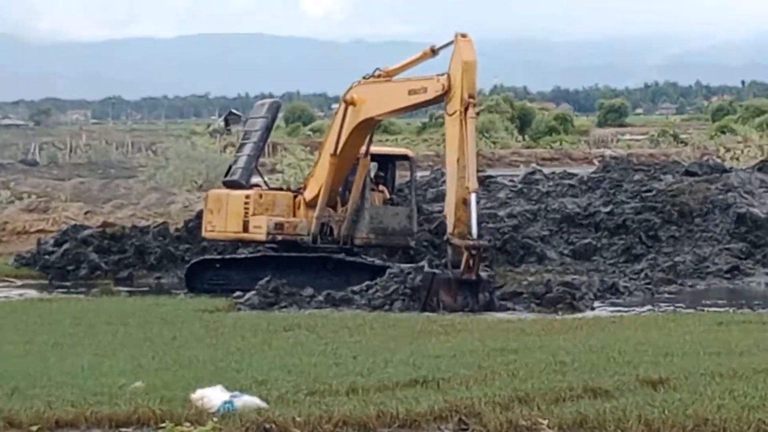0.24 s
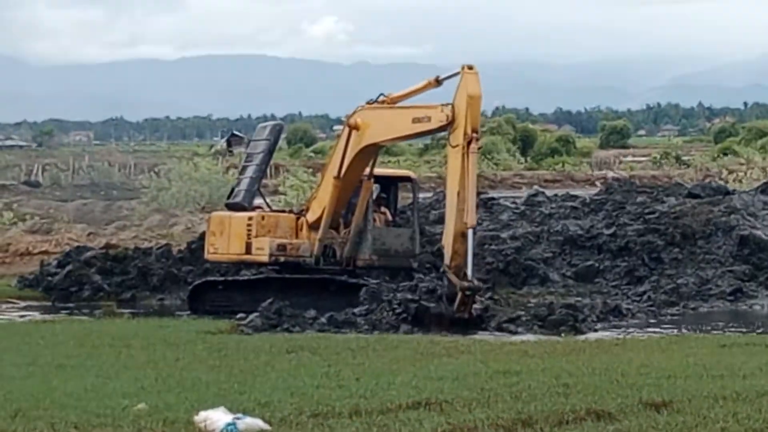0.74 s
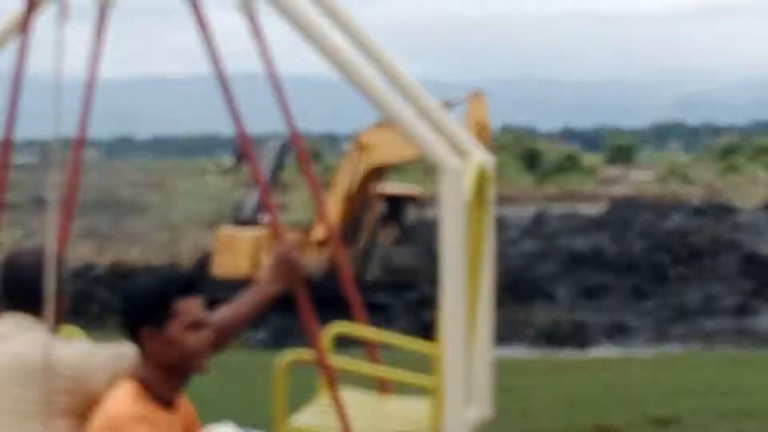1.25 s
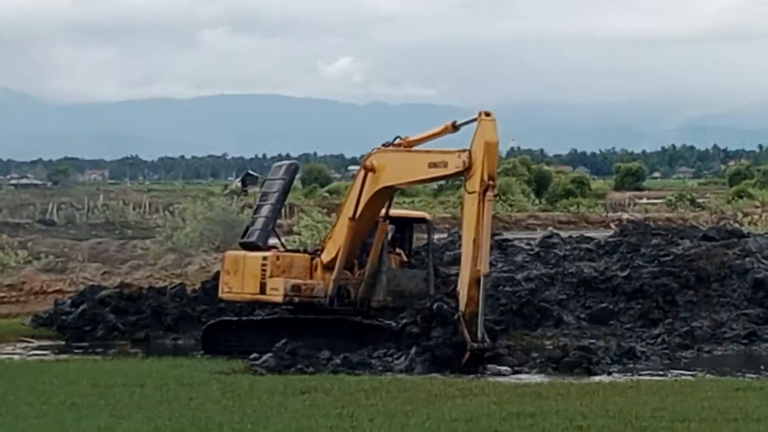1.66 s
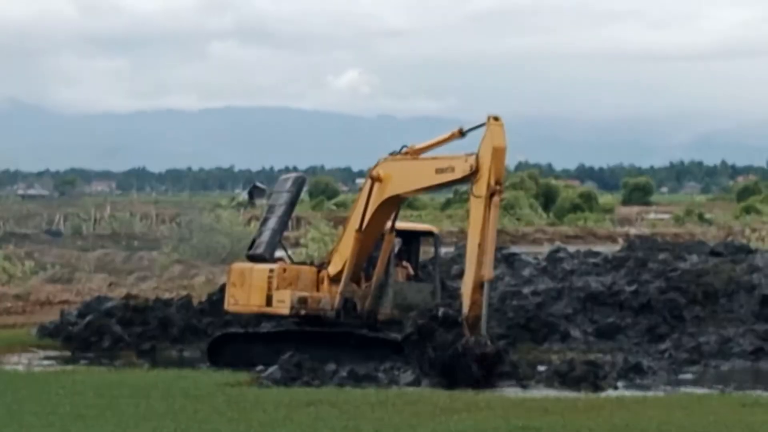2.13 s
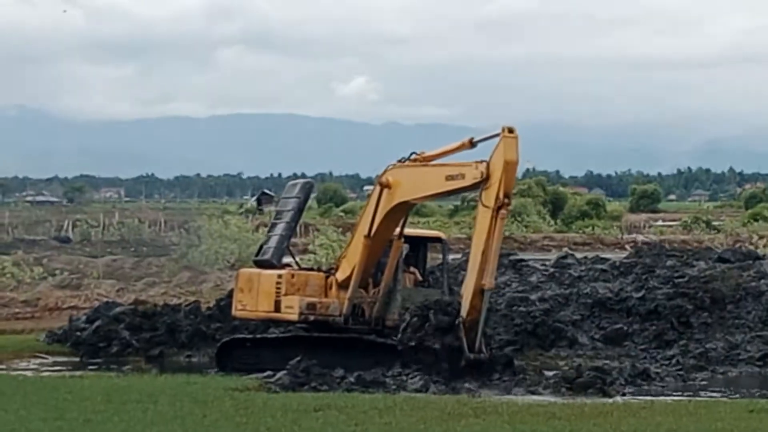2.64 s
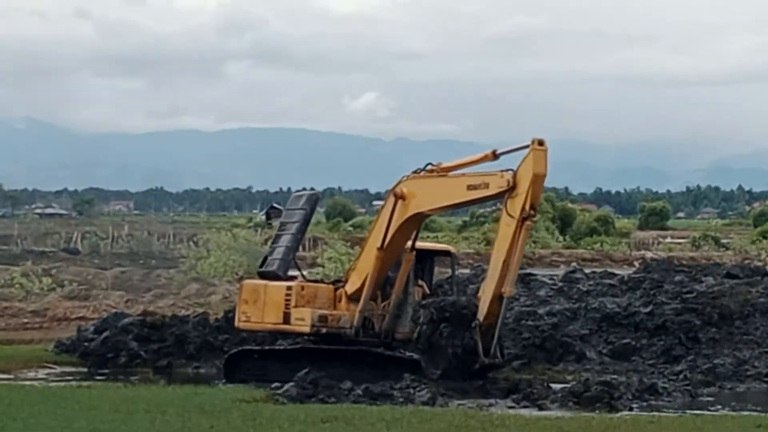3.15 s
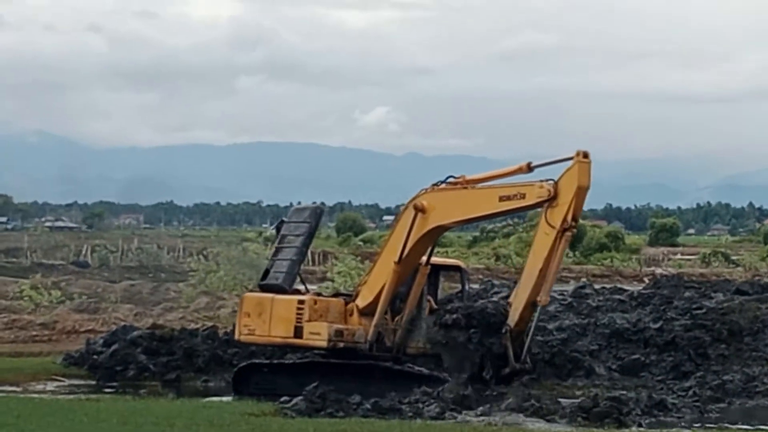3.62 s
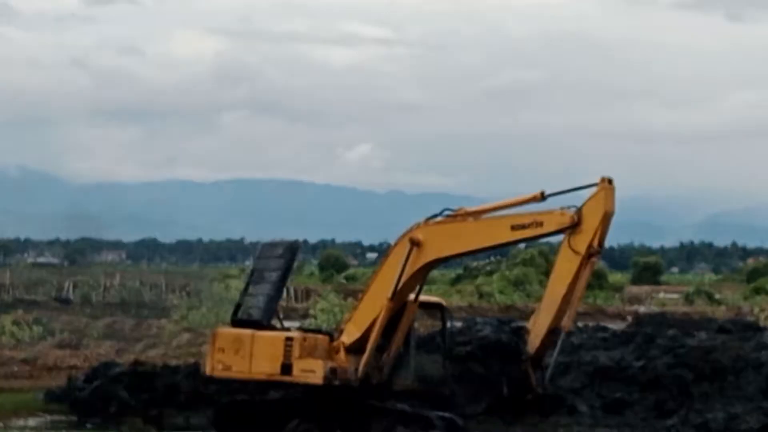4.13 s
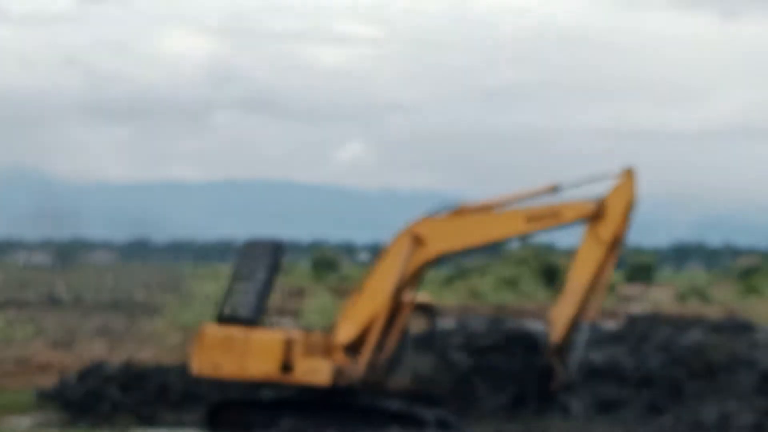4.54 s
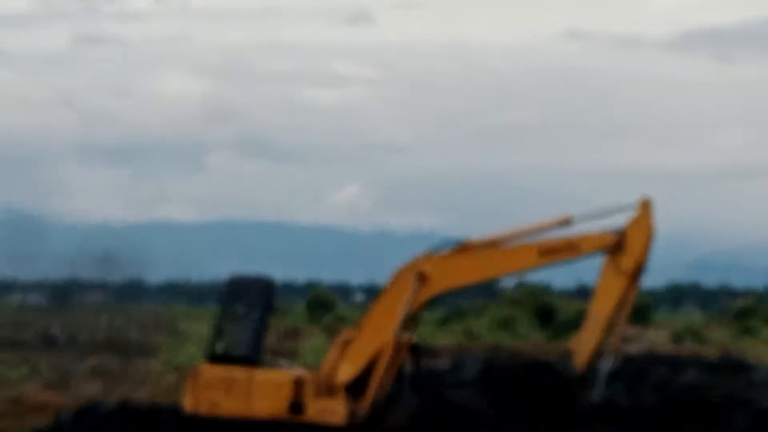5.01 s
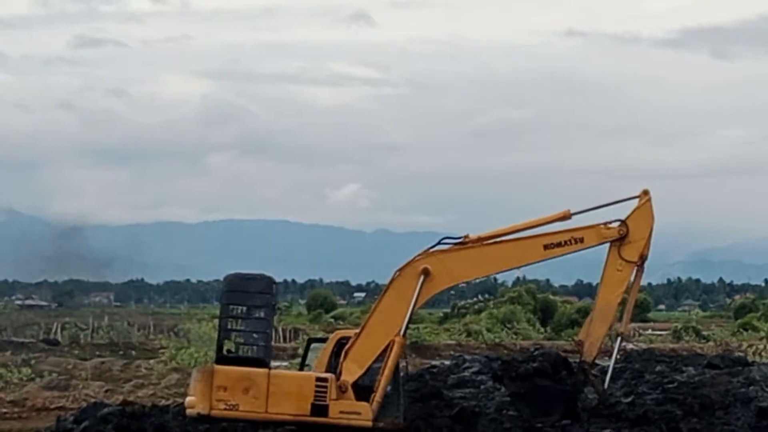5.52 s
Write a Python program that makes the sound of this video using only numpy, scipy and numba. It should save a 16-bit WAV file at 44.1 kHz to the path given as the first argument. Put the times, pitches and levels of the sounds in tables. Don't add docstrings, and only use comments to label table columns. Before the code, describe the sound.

A single-cylinder diesel thumps fast, swells close with clatter and hiss, recedes, then returns with metallic ticking and rattles outdoors.

```python
import sys
import numpy as np
from scipy import signal
from scipy.fft import rfft, irfft, next_fast_len
from scipy.io import wavfile
from scipy.ndimage import uniform_filter1d
from numba import njit

SR = 44100
rng = np.random.default_rng(int(sys.argv[2]) if len(sys.argv) > 2 else 0)


def boost_factor(decibels):
    exponent = np.asarray(decibels, float) / 20
    return 10 ** exponent


def wav_record(signal):
    frames = np.transpose(np.atleast_2d(signal))
    bounded = np.clip(frames, -1, 1)
    quanta = np.round(bounded * 32767).astype(np.int16)
    wavfile.write(sys.argv[1], SR, quanta)


N = 254456
T = np.arange(N) / SR

# freq_hz, level_db (per Hz)
PIPE_TONE = [(15, -77), (25, -40), (48, -8), (64, -17), (102, -9.5), (123, 3), (140, 6), (198, -7),
             (223, -22.5), (279, -11), (395, -14.5), (458, -23), (525, -24), (677, -29), (900, -14.5),
             (1170, -45), (1980, -120)]
# time_s, ahead_firings
ARRIVAL_SHIFT = [(0, -.5), (1.2, -.52), (2, -.56), (2.6, -.59), (3.25, -.63), (3.6, -.57), (4, -.46),
                 (4.5, -.4), (5, -.33), (5.3, -.24), (5.77, -.18)]
# time_s, pipe_nearness_db, ground_echo_on_upper_mode_db, casing_sight_db, hiss_aim_db
RIDE = [(0, -23, 1, -13, -8.5), (.22, -17, -1, -10, -7), (.45, -12, -6.5, -5.5, -5.5),
        (.8, -7, -0.5, -3, -2.5), (1.2, -2, -0.5, -.5, -0.5), (1.45, 0.5, -5, 0, -1.5),
        (1.9, -1.5, 1.5, -1, -1), (2.3, -5, 1.5, -5, 3), (2.6, -12.5, 7, -7.5, 2.5),
        (2.8, -13, -1.5, -10.5, 0.5), (2.95, -12.5, -1, -16.5, 3), (3.2, -15, -4.5, -23, 3),
        (3.7, -17.5, 4, -23.5, 2), (4.2, -15.5, -3.5, -25.5, -1.5), (4.6, -16.5, -5, -25, -4.5),
        (4.85, -19, -1, -25, -5), (5.25, -14.5, -2.5, -27.5, -0.5), (5.77, -14, -4.5, -23, 7.5)]
# time_s, length_s, level_db
SURGES = [(.14, 0.032, 2), (.31, 0.026, 0), (2.0, 0.026, -1.5), (2.15, 0.04, -4), (2.73, 0.025, -0.5),
          (3.1, 0.035, 5), (3.17, 0.084, -4.5), (3.57, 0.042, -4.5), (3.95, 0.037, -1.5), (4.26, 0.047, 4),
          (4.39, 0.028, -6), (4.46, 0.035, 3.5), (5.35, .025, -8), (5.4, 0.018, 7), (5.445, 0.025, -15),
          (5.485, 0.017, 6.5), (5.54, .025, -10)]
# freq_hz, level_db (per Hz)
CASING_TONE = [(290, -20.5), (500, 24), (676, 1.5), (915, -2), (1040, -2.5), (1370, -1), (1750, -3.5),
               (2020, -5), (2690, -18), (3590, -23), (4510, -38), (7150, -24), (8370, -21.5), (13100, -30),
               (15500, -41)]
# level_in_full_sight_db, share_of_sight (dB per dB), gain_coming_round_db
CASING_BANDS = [
    (-40, 1.05, 17.5),
    (-42.5, 0.65, 8),
    (-47.5, 1.13, -2),
    (-49, 0.52, -0.6),
]
# time_s, length_s, level_db
FLASHES = [(2.03, 0.037, -1), (2.12, .025, 0.5), (2.17, 0.036, -3), (3.29, 0.021, -1), (5.15, 0.035, 1.5),
           (5.53, 0.019, -4), (5.62, 0.023, 2.5)]
# time_s, first_gap_hz, first_depth_db, upper_depth_db
HAND_GAPS = [(0, 2810, 19, 7), (.9, 3070, 18, 14), (1.3, 3550, 9.5, 17), (1.7, 4210, 16.5, 16),
             (2.1, 4690, 16.5, -2), (3.1, 5560, 19.5, 1.5), (4.3, 5880, 19, -2.5), (5.77, 6100, 37, -1)]
# start_s, end_s, first_hz, last_hz, level_db
PANELS = [(0, 0.93, 760, 700, -48), (0, 0.69, 1430, 1410, -52), (.5, 1.23, 1110, 1105, -46),
          (0.8, 1.8, 10180, 9640, -53.5), (0.5, 1.32, 3900, 4020, -64.5), (2.5, 3.08, 808, 917, -47.5),
          (3, 3.84, 780, 788, -55), (2.5, 3.6, 960, 1027, -59), (3, 4.93, 1464, 1490, -62),
          (3.5, 4.58, 2010, 1900, -57.5), (4.5, 5.42, 1803, 1795, -56.5), (5, 5.56, 1270, 1400, -57.5),
          (5.5, 5.83, 2550, 2680, -70.5), (5, 5.86, 1163, 995, -52.5), (5, 5.74, 244, 255, -52.5),
          (4.5, 5.64, 7800, 7750, -65), (4.5, 6, 8500, 8600, -65), (6, 5.77, 2000, 2200, -67),
          (3, 3.19, 2015, 1890, -52.5), (1, 2.4, 5600, 6760, -60.5), (5, 5.26, 1600, 1770, -57)]
# time_s, tick_db
GEAR_TEETH = [
    (4.18, -54),
    (4.7, -42.5),
    (5.3, -46),
    (5.77, -41.5),
]
# time_s, peak_db, pitch_hz
KNOCKS = [(4.1258, -57, 8300), (4.2086, -50, 8270), (4.7788, -33.5, 8660), (4.8157, -42.5, 8550),
          (4.9955, -39.5, 7920), (5.1821, -34.5, 8480), (5.3889, -39, 8320), (5.5733, -38, 8770),
          (5.6179, -33.5, 9210), (5.693, -36, 9100)]
# time_s, peak_db, pitch_hz
JINGLES = [(4.264, -46, 9900), (4.4245, -44, 11040), (4.453, -49, 10000), (4.6705, -48, 11200),
           (4.824, -48, 11400), (4.9589, -45.5, 10800), (4.9913, -41.5, 11400), (5.1789, -49, 11300),
           (5.3101, -52, 12100), (5.351, -45, 10400), (5.4123, -46, 10100), (5.4657, -52, 11600),
           (5.5066, -51, 12000), (5.558, -42, 11000), (5.5919, -39, 11300), (5.6164, -42, 12600),
           (5.6553, -49, 12000), (5.6937, -47, 11600), (5.722, -35.5, 10700)]
# time_s, peak_db, pitch_hz
CHIRPS = [(4.06, -66, 3720), (4.958, -64, 5300), (5.1952, -64, 4370), (5.3922, -62, 4540),
          (5.703, -72, 4400), (5.6, -43, 610), (5.22, -48, 680), (5.33, -47.5, 510), (2.9081, -78, 4380),
          (2.9455, -68, 4400), (3.0632, -72, 4350), (3.174, -76, 4380), (3.2164, -73, 4380),
          (3.6469, -78, 4400), (4, -76, 4350), (3.7626, -74, 4350), (3.84, -75, 4000), (1, -56, 3100),
          (1.1, -51.5, 3900), (1.1897, -52.5, 4250), (.232, -43, 720), (.53, -42, 600)]
# time_s, level_db
DIGGER_LOAD = [
    (0, -64),
    (2.3, -47),
    (2.9, -45),
    (3.07, -61),
    (3.55, -57),
    (3.86, -39),
    (3.97, -56),
    (4.26, -39),
    (5.77, -41),
]
# freq_hz, level_db (per Hz)
FIELD_TONE = [(12, -71), (20, -22), (144, -7.5), (191, -7), (238, -35), (333, -20), (549, -30.5),
              (1980, -32), (4810, -72), (8640, -46), (15500, -90)]
# time_s, length_s, freq_hz, width_hz, level_db
SHADOWS = [(0.31, 0.11, 295, 44, -24), (0.12, 0.46, 936, 123, -15.5), (2.25, 0.2, 1090, 80, -9.5),
           (5.61, 0.28, 818, 102, -19), (4.7, 0.056, 530, 250, 12.5), (3.47, 0.11, 410, 126, 11),
           (3.92, 0.077, 350, 95, 8), (4.45, 0.083, 313, 67, 10), (2.55, 0.14, 263, 39, 5),
           (2.05, 0.15, 353, 44, -6.5), (1.55, 0.17, 286, 24, -2.5), (4.75, 0.1, 1215, 140, 14),
           (0.14, 0.083, 240, 65, 10), (3.04, .12, 770, 55, -13), (0.44, 0.26, 426, 33, 8),
           (3.15, 0.32, 410, 44, -11), (3.16, 0.14, 310, 27, 5.5), (0.95, 0.26, 270, 55, 3.5),
           (5.21, 0.18, 303, 110, -8.5), (2.85, 0.17, 1240, 190, -6), (2.1, 0.66, 3030, 700, 3),
           (0.25, 0.61, 2730, 100, 13), (3.5, 0.37, 43, 36, -8)]
# time_s, length_s, freq_hz, width_hz, level_db
MIRRORS = [(.4, .45, 2460, 91, -11), (.3, .35, 3200, 89, 7), (.85, .08, 3250, 100, 6),
           (1.35, 0.16, 3600, 90, 11), (1.35, 0.16, 3070, 70, -7), (0.67, .3, 2900, 110, -6),
           (.9, 0.39, 3570, 110, -9), (0.13, 0.28, 3800, 130, 5.5), (1.1, 0.34, 4700, 100, 13),
           (1.57, .2, 2220, 100, 6.5), (1.8, .08, 2160, 150, 4.5), (1.28, 0.075, 2600, 130, 1),
           (2.95, 0.12, 3800, 140, 6), (2.83, .1, 3150, 92, 4), (3.45, .05, 2500, 110, 14),
           (5.5, .06, 4150, 100, 10), (5.4, .04, 3950, 100, 9), (5.1, 0.14, 2200, 120, -3.5),
           (3.8, 0.077, 1850, 80, 5), (5.3, .12, 1500, 120, 4), (5.7, .12, 960, 55, 5),
           (5.42, .1, 1230, 100, 4.5), (5.26, 0.041, 1780, 200, 5.5), (5.68, 0.15, 1940, 170, 4.5),
           (2.93, 0.14, 310, 36, 1.5), (2.19, 0.15, 280, 65, 4), (4.75, 0.071, 330, 43, 11),
           (5.62, 0.057, 370, 60, -8), (3.65, .15, 5300, 450, -6)]
# freq_hz, width_hz, level_db
PORT_DIPS = [(4800, 300, -17), (6300, 200, -5), (9400, 250, -8), (11300, 400, -4), (14100, 500, -5)]


def columns(table):
    s, *rest = np.transpose(table)
    return [np.interp(T, s, c) for c in rest]


def unit(x):
    return x / np.sqrt(np.mean(x ** 2))


def bumps(events):
    return sum(db * np.exp(-((T - s) / length) ** 2) for s, length, db in events)


def walk(rate):
    hold = int(SR / rate)
    steps = np.repeat(rng.standard_normal(N // hold + 1), hold)
    return 1.053 * uniform_filter1d(uniform_filter1d(steps, hold), hold)[:N]


def puff(phase, start, length):
    return np.exp(-((phase - start) % 1) / length)


def colour(x, points, build_up=0.):
    size = next_fast_len(N + 16384, real=True) // 2 * 2
    hz, db = np.transpose(points)
    log_gain = np.interp(np.log(np.fft.rfftfreq(size, 1 / SR) + 1), np.log(hz), db) * np.log(10) / 20
    cepstrum = irfft(log_gain, size)
    cepstrum[1:size // 2] *= 2 - build_up
    cepstrum[size // 2 + 1:] *= build_up
    return irfft(rfft(x, size) * np.exp(rfft(cepstrum)), size)[:N]


def band(x, lo_hz, hi_hz):
    octave = np.log2(np.fft.rfftfreq(N, 1 / SR) + 1)

    def edge(hz):
        return .5 + .5 * np.tanh((octave - np.log2(hz)) * 12)

    return unit(irfft(rfft(x) * (edge(lo_hz) - edge(hi_hz)), N))


@njit
def svf(x, hz, width):
    y, b, l = np.empty(len(x)), 0., 0.
    for i in range(len(x)):
        g, k = np.tan(np.pi * hz[i] / SR), width / hz[i]
        v = (b + g * (x[i] - l)) / (1 + g * (g + k))
        b, l, y[i] = 2 * v - b, l + 2 * g * v, k * v
    return y


def echoes(x, paths):
    i = np.arange(N)
    return x + sum(gain * np.interp(i - SR * lag_s * (1 + 0.1926 * walk(1.5)), i, x) for lag_s, gain in paths)


def cells_of(x):
    hz, s, cells = signal.stft(x, SR, nperseg=1024, noverlap=768)
    return hz[:, None], s, cells


def sound_of(cells):
    return signal.istft(cells, SR, nperseg=1024, noverlap=768)[1][:N]


def exhaust_levels():
    near, ground, sight, _ = columns(RIDE)
    pipe = -24.5 + near
    behind_s = np.maximum(T - 2.68, 0)
    bark = -34.5 + 0.56 * near - 8 * behind_s
    upper_bark = -37 + 1.27 * sight
    return [db + bumps(SURGES) for db in (pipe, pipe + ground, bark, upper_bark)]


def exhaust(turns):
    opened = np.floor(turns + .23).astype(int) + 1
    chance = rng.standard_normal((opened[-1] + 1, 2))
    at = np.flatnonzero(np.diff(opened))
    jitter = (6 * chance[opened[at], 0]).astype(int)
    blows = np.zeros(N)
    blows[np.clip(at + jitter, 0, N - 1)] = -boost_factor(1.0 * chance[opened[at], 1])

    bark = echoes(colour(blows, PIPE_TONE), [(.005, .6), (.0085, -.55), (.013, .45), (.022, .3)])
    ring = colour(np.roll(blows, int(.0072 * SR)), PIPE_TONE, build_up=.65)
    gas = colour(rng.standard_normal(N) * (.55 + puff(turns, .78, .4)), PIPE_TONE)
    smear = np.interp(T, [0, .6, 2.6, 3.2, 5.0, 5.77], [.08, .04, .04, .08, .08, .2])
    # source, low edge Hz, high edge Hz, times more smear
    slices = [(ring, 57, 150, 1), (ring, 150, 220, 1), (bark, 220, 430, 6), (bark, 430, 680, 9)]
    out = 0
    for db, (x, lo_hz, hi_hz, more) in zip(exhaust_levels(), slices):
        share = np.clip(smear * more, 0, 1)
        tone = np.sqrt(1 - share) * band(x, lo_hz, hi_hz)
        out = out + boost_factor(db) * (tone + np.sqrt(share) * band(gas, lo_hz, hi_hz))
    return out, blows


def casing_levels(gap_hz):
    _, _, sight, aim = columns(RIDE)
    again = np.clip((T - 4.705) / 0.96, 0, 1)
    mask = -9.5 * np.exp(-((gap_hz - 3220) / 780) ** 2)
    flashes = bumps(FLASHES)
    return [db + share * sight + round_db * again + flashes + more
            for (db, share, round_db), more in zip(CASING_BANDS, (0, 0, mask, aim))]


def hand_gaps(x):
    hz, s, cells = cells_of(x)
    first_hz, first_db, upper_db = (np.interp(s, T, c) for c in columns(HAND_GAPS))
    gaps = [(first_hz, 600., first_db), (2.056 * first_hz, 500., upper_db),
            (first_hz + 7630, 600., .5 * upper_db)]
    for gap_hz, width, depth_db in gaps:
        depth_db = depth_db * (1 + .18 * np.interp(s, T, walk(20)))
        cells = cells * boost_factor(-depth_db * np.exp(-((hz - gap_hz) / width) ** 2))
    return sound_of(cells)


def block(turns, blows):
    tick = puff(turns, 0.93, 0.079) * boost_factor(1.6 * walk(26.15))
    stand_out = np.interp(T, [0, 3.0, 3.5, 4.2, 4.6], [1.3, 0.98, 2.7, 2.1, .5])
    grit = unit(boost_factor(2.0 * rng.exponential(size=N)) * rng.standard_normal(N))
    roar = rng.standard_normal(N) * (1 + .55 * puff(turns, .85, .3))
    body = colour(roar + .25 * unit(blows), CASING_TONE)
    middle = colour(rng.standard_normal(N) * (1 + 0.6 * tick), CASING_TONE)
    bright = colour(grit * (1 + stand_out * tick) * boost_factor(0.5 * walk(8.9)), CASING_TONE)
    blast = uniform_filter1d(puff(turns, 0.86, 0.3), SR // 120) * boost_factor(6.1 * walk(12))
    jet = colour(grit * (.5 + blast), CASING_TONE)
    fade = boost_factor(np.interp(T, [.33, .4, 1.4, 2.05, 2.6, 3.2, 5.0, 5.77],
                         [-16, -6.5, -4.5, -15, -11, -17.5, -10, -2.5]))
    top = hand_gaps(band(middle, 2315, 5230) + band(bright, 4980, 10540) + fade * band(jet, 10700, 17500))

    parts = band(body, 684, 1291), band(body, 1299, 2370), band(top, 1810, 5100), band(top, 4340, 18000)
    out = 0
    for db, x in zip(casing_levels(columns(HAND_GAPS)[0]), parts):
        slow_rms = np.sqrt(uniform_filter1d(x ** 2, SR // 3))
        out = out + boost_factor(db + 0.38 * walk(9)) * x / slow_rms
    return out


def panels(turns, blows):
    out = 0
    for start, end, first_hz, last_hz, db in PANELS:
        loose = start > 4.95 or 3000 < first_hz < 7000
        width = 0.96 * (33 + (0.066 + 0.11 * loose) * first_hz)
        shake = rng.standard_normal(N) * (1 + 0.2 * puff(turns, 0.99, 0.39))
        shake = shake + 1.95 * unit(blows) * (first_hz < 950) * np.interp(T, [1, 2.5], [1, .5])
        centre = np.interp(T, [start, end], [first_hz, last_hz]) * (1 + .006 * walk(4))
        ring = svf(svf(shake, centre, width), centre, width)
        facing = np.clip(np.minimum(T - start + 0.17, end - T + 0.15) / 0.3, 0, 1)
        out = out + boost_factor(db + 0.8 * walk(14)) * facing * unit(ring)
    return out


def gear():
    s = np.arange(4.1805, N / SR, .03895)
    chance = rng.standard_normal((len(s), 5)).T
    db = np.interp(s, *np.transpose(GEAR_TEETH))
    s = s + .002 * chance[0]
    tick_hz = 7850 + 350 * (s - s[0]) + 120 * chance[2]
    ticks = zip(s, db + 3 * chance[1], tick_hz)
    squeaks = zip(s, np.maximum(db, -46) - 25 + 2.5 * chance[3], 4410 + 40 * chance[4])
    return list(ticks), list(squeaks)


def rattle(events, ring_s, buzz_s, width):
    out, t = np.zeros(N + 2500), np.arange(2500) / SR
    onset = np.sin(np.pi / 2 * np.minimum(t / 0.0013, 1)) ** 2
    for s, db, hz in events:
        centre = hz + 0 * t
        buzz = unit(svf(svf(rng.standard_normal(len(t)), centre, width), centre, width))
        ring = np.sin(2 * np.pi * hz * t) * np.exp(-t / ring_s)
        i = int(s * SR)
        out[i:i + len(t)] += boost_factor(db) * (ring + 0.22 * buzz * np.exp(-t / buzz_s)) * onset
    return out[:N]


def digger():
    cycles = np.cumsum(86.1 * (1 + 0.0031 * walk(3.09))) / SR
    return np.sqrt(2) * np.sin(2 * np.pi * cycles) * boost_factor(columns(DIGGER_LOAD)[0] + 1.0 * walk(11))


def field():
    return boost_factor(-51.5 + 3.8 * walk(1.85)) * unit(colour(rng.standard_normal(N), FIELD_TONE))


def scene():
    firing_hz = 27.2
    turns = firing_hz * T + columns(ARRIVAL_SHIFT)[0]
    pipe, blows = exhaust(turns)
    ticks, squeaks = gear()
    frame = rattle(ticks + list(KNOCKS), ring_s=0.002, buzz_s=0.0085, width=1400.0)
    frame = frame + rattle(JINGLES, ring_s=0.0014, buzz_s=0.014, width=3400.0)
    squeak = rattle(CHIRPS, ring_s=0.011, buzz_s=0.049, width=250.)
    squeak = squeak + rattle(squeaks, ring_s=.008, buzz_s=.03, width=200.)
    mix = pipe + block(turns, blows) + panels(turns, blows) + frame + squeak + digger() + field()
    return mix[None]


def suppress_noise(hz, cells):
    power = uniform_filter1d(np.abs(cells) ** 2, size=4, axis=1) + 1e-16
    contrast = power / uniform_filter1d(power, size=50, axis=1)
    gain = np.minimum(contrast ** (.22 + .1 * np.exp(-((hz - 3000) / 1500) ** 2)), 1.6)

    def smooth(bins, frames):
        noise = rng.standard_normal(cells.shape)
        return unit(uniform_filter1d(uniform_filter1d(noise, bins, 0), frames, 1))

    patches_db = 1.8 * smooth(bins=3, frames=16)
    patches_db = patches_db + 1.5 * np.clip(hz / 9000, 0, 1.5) * smooth(bins=30, frames=6)
    reach = np.clip((hz - 400) / 500, 0, 1.)
    return cells * (gain * boost_factor(patches_db)) ** reach


def top_cut(x):
    return signal.sosfilt(signal.butter(12, 15690, fs=SR, output="sos"), x)


def record(dry):
    ceiling = .4
    hz, s, cells = cells_of(ceiling * np.tanh(dry[0] / ceiling))
    for at, length, shadow_hz, width, db in SHADOWS + MIRRORS:
        cells = cells * boost_factor(db * np.exp(-((hz - shadow_hz) / width) ** 2 - ((s - at) / length) ** 2))
    for dip_hz, width, db in PORT_DIPS:
        cells = cells * boost_factor(db * np.exp(-((hz - dip_hz) / width) ** 2))
    mix = sound_of(suppress_noise(hz, cells))[None]
    return top_cut(mix)


dry = scene()
out = record(dry)
wav_record(out)
```